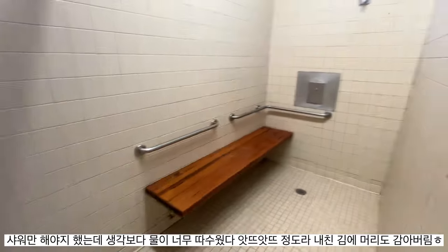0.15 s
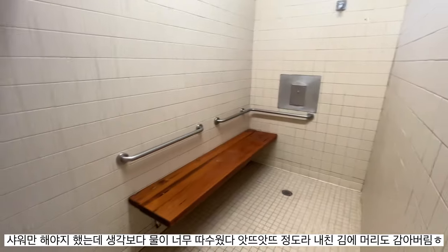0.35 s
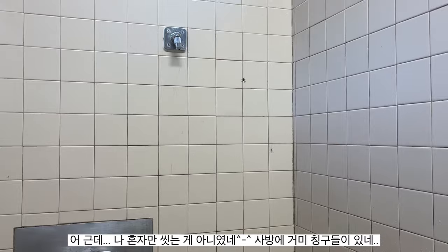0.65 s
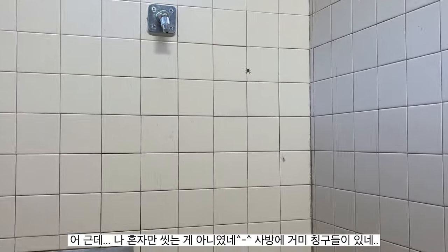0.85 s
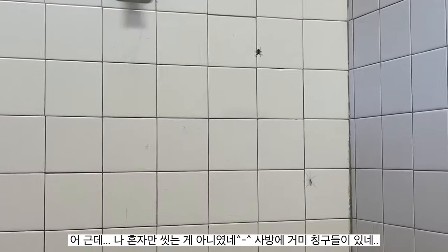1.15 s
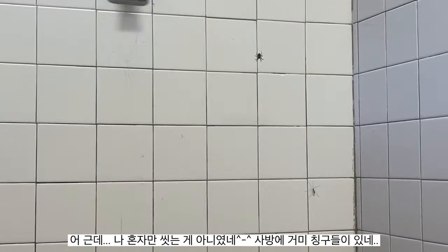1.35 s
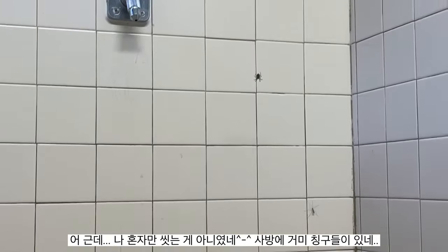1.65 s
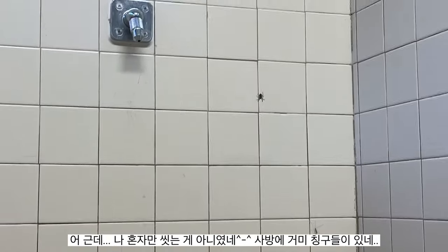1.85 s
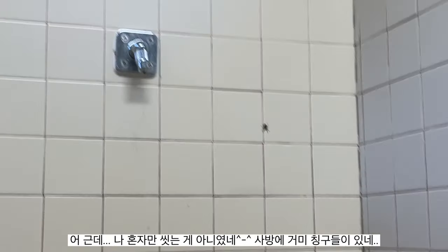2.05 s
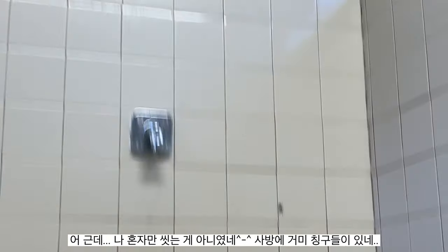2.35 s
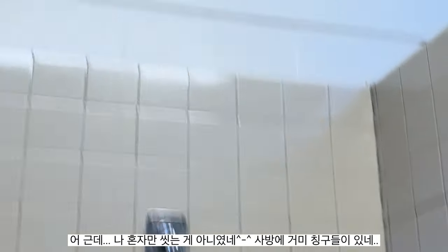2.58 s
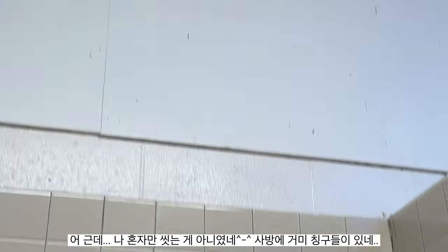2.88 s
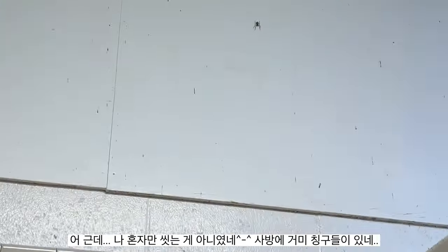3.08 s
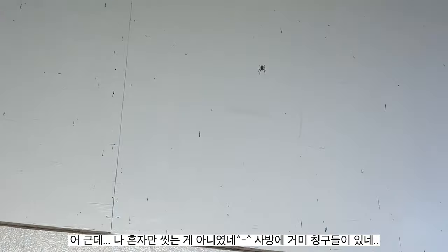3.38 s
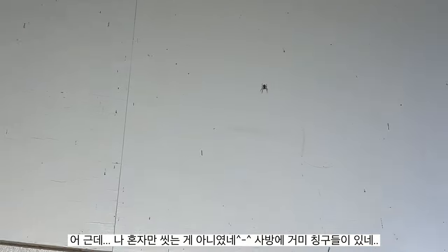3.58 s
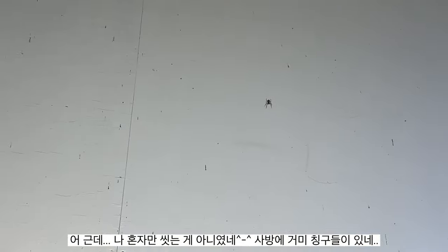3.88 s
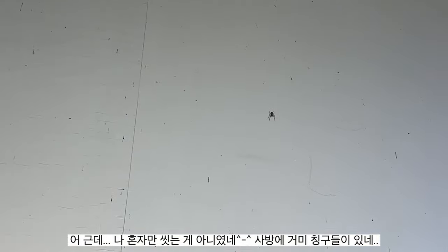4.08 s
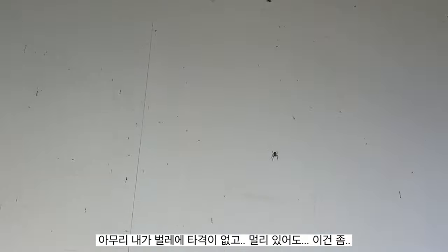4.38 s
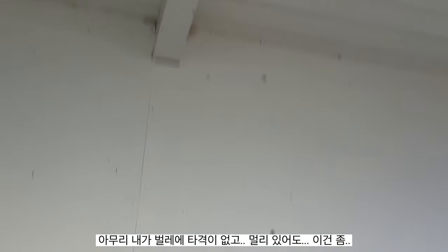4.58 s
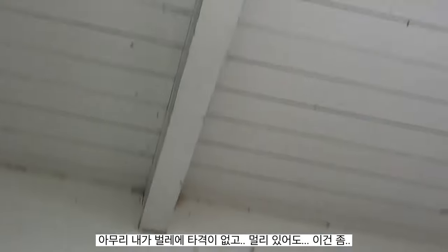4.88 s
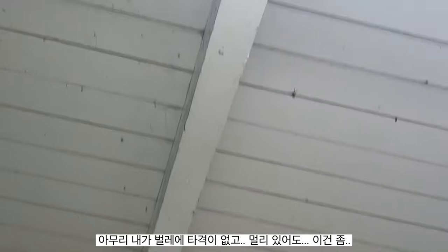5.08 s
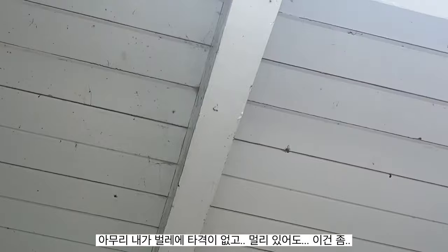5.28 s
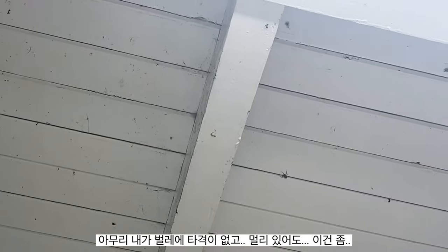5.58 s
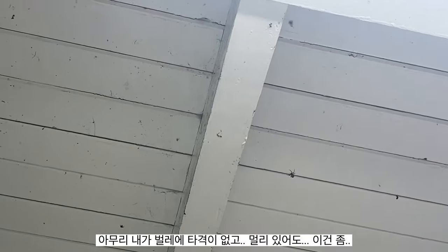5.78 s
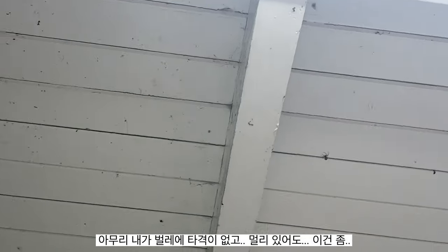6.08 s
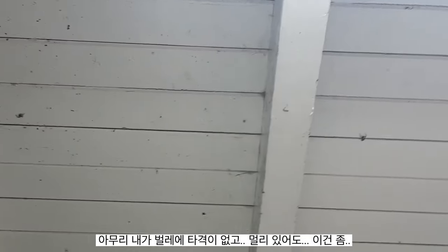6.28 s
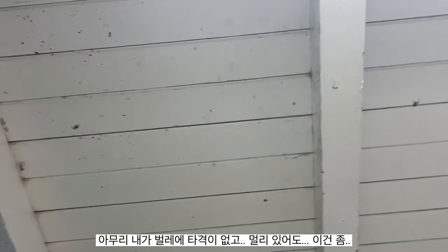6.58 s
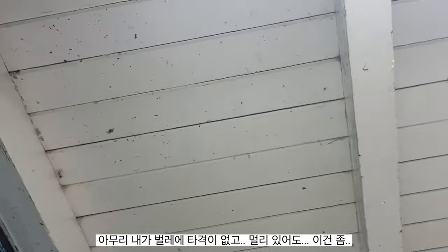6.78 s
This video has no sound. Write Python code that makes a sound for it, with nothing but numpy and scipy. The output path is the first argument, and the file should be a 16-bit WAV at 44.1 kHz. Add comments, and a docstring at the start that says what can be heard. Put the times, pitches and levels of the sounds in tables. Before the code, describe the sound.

Steady shower water drums and hisses on tiles in a small echoing stall, growing nearer at first, with sharp drips and small splashes.

```python
"""Shower in a tiled stall

Steady water on a small stall floor, heard from a camera carried up to it and tilted to the ceiling.
Shaped noise and thousands of random drop bursts make the wash and the bright hiss; timed bursts make
near ticks, slaps of water lumps and finger rubs on the camera. Decaying noise rings as the walls.
Low noise and damped sines make the building's rumble and the bumps; a noise swell makes a swish.
"""
import sys
import numpy as np
from scipy import signal
from scipy.fft import rfft, irfft, next_fast_len
from scipy.io import wavfile
from scipy.ndimage import map_coordinates

SR = 44100
rng = np.random.default_rng(int(sys.argv[2]) if len(sys.argv) > 2 else 0)


def dump(signal):
    """Clip the signal to [-1, 1] and save it as 16-bit WAV at the path in sys.argv[1]."""
    limited = np.clip(np.atleast_2d(signal).T, -1, 1)
    pcm = np.round(limited * 32767).astype(np.int16)
    wavfile.write(sys.argv[1], SR, pcm)


N = 306054

# Wash spectrum: f/Hz, gain/dB
WASH_SPECTRUM = [(60, -24), (130, -2.5), (220, -1.5), (330, -1.5), (520, 0.5), (800, 0.5), (1050, -2),
                 (1500, -2), (2000, -3), (3300, -6), (5000, -7.5), (8000, -13.5), (16000, -37)]
WASH_DB = -49  # at nearness 0 dB


def wash():
    """Water drumming on the wet floor: steady noise plus soft plops blurred by the room."""
    plops = patter(count=2600, low_hz=990, high_hz=4060, t60_s=.012, octaves=0.38,
                   scatter_db=2.5, rise_s=0.0018, size=512)
    water = rng.standard_normal((2, N)) + amp(-12.5) * stall(plops, wet_db=-4.0)
    return amp(WASH_DB + nearness_db()) * spread(water, WASH_SPECTRUM) * pan(.2)


# Spray spectrum: f/Hz, gain/dB
SPRAY_SPECTRUM = [(400, -30), (1500, -8.5), (3000, -0.5), (5000, -3.5), (7500, -2), (9500, -0.5),
                  (12500, -0.4), (13600, -2.5), (15800, -5)]
SPRAY_DB = -48  # at nearness 0 dB, before sway
SPRAY_DB_PER_NEARNESS_DB = 1.62  # heard directly, so it gains more than the wash
SWAY_DB, SWAY_KNOTS_PER_S = .35, 7  # the jet sways


def spray():
    """Fine drops crackle on the tiles in clumps, mostly to the left, over the hiss of the mist."""
    sway_db = SWAY_DB * wobble(SWAY_KNOTS_PER_S)
    spray_db = SPRAY_DB + SPRAY_DB_PER_NEARNESS_DB * nearness_db() + sway_db
    fine = patter(count=5000, low_hz=2560, high_hz=14900, t60_s=0.0044, octaves=0.73,
                  scatter_db=3, rise_s=0.0011, size=192)
    coarse = patter(count=480, low_hz=3270, high_hz=12900, t60_s=0.01, octaves=0.43,
                    scatter_db=2.0, rise_s=0.0016, size=512)
    clumping = amp(0.88 * wobble(26) + 0.59 * wobble(8.2))
    crackle = stall((fine + amp(-0.5) * coarse) * clumping, wet_db=-5.5)
    crackle = amp(-1.5) * spread(crackle, SPRAY_SPECTRUM) * pan(3.3)
    mist = spread(rng.standard_normal((2, N)), SPRAY_SPECTRUM) * amp(1.6 * wobble(30)) * pan(1.9)
    return amp(spray_db) * unit(crackle + mist)


# Fat close drops: t/s, level/dB, f/Hz
TICK_DROPS = [(.786, -30.5, 9400), (1.735, -32.5, 4000), (2.701, -32, 4200), (2.869, -32, 9000),
              (2.9881, -28.5, 3600), (2.992, -28.5, 6300), (3.677, -28.5, 10500), (3.769, -29.5, 3900),
              (4.19, -29, 4500), (4.24, -32, 6250), (4.267, -31, 9500), (4.489, -29, 6000),
              (4.697, -28.5, 9500), (4.88, -32, 3600), (5.587, -28, 3840), (6.738, -28, 11300)]
STRAY_DB = -66.5  # rms of stray drops at nearness 0 dB, before the stall


def ticks():
    """Single fat drops hit the tiles close by, with lesser random strays."""
    t_s, level_db, f_hz = np.transpose(TICK_DROPS)
    drops = splashes(f_hz, t60_s=0.0098, octaves=0.74, size=1024, rise_s=0.00073)
    drops = drops * amp(level_db)[:, None, None]
    strays = patter(count=30, low_hz=3200, high_hz=12000, t60_s=0.0086, octaves=0.53,
                    scatter_db=-0.5, rise_s=.0011, size=1024)
    strays = amp(STRAY_DB + nearness_db()) * strays
    return stall(place(t_s + .001, drops) + strays, wet_db=-5.0) * pan(2.9)


# Lumps of water: t/s, level/dB, f/Hz, t60/s
WATER_LUMPS = [(2.705, -48.5, 4500, .16), (3.546, -46, 3700, .14), (3.762, -49, 7000, .16),
               (3.986, -39.5, 13500, 0.11), (4.683, -42, 10000, .08), (5.2, -42.5, 11000, .14),
               (5.44, -42, 11500, 0.2), (5.545, -45, 2400, 0.2), (5.59, -44, 6530, 0.13),
               (6.74, -49, 10000, .17)]


def slaps():
    """Lumps of water land and scatter: longer noise bursts that ring in the stall."""
    t_s, level_db, f_hz, t60_s = np.transpose(WATER_LUMPS)
    lumps = splashes(f_hz, t60_s, octaves=0.86, size=8192, rise_s=0.0018)
    lumps = lumps * amp(level_db)[:, None, None]
    return stall(place(t_s, lumps), wet_db=-11) * pan(1)


# Camera's place relative to the water: t/s, level/dB
CAMERA_NEARNESS = [(0, -8.5), (.35, -2), (.68, -2.5), (1.2, 0.4), (2.35, 0.84), (2.75, -0.34), (6.94, -.5)]


def nearness_db():
    """Level change of the water with the camera's place, per sample."""
    return curves(CAMERA_NEARNESS)[0]


# Close water, little bass and a slightly duller top: f/Hz, gain/dB
CLOSE_COLOUR = [(800, -6), (2000, -0.5), (3200, 1.1), (12500, 1), (14000, -1)]


def close_water():
    """Ticks and slaps with the colour of close water."""
    return filtered(ticks() + slaps(), lambda hz: amp(along(CLOSE_COLOUR, hz)))


# Fingers shifting on the camera body: t/s, level/dB, f/Hz
FINGER_RUBS = [(1.49, -39, 1150), (1.929, -39, 2000), (2.325, -37.5, 1800), (4.522, -38, 600),
               (4.534, -39, 1700), (4.543, -36.5, 685), (5.576, -44, 1300)]


def brushes():
    """Fingers rub the camera body next to the right microphone, too close to ring in the room."""
    t_s, level_db, f_hz = np.transpose(FINGER_RUBS)
    rubs = splashes(f_hz, t60_s=.075, octaves=.5, size=4096, rise_s=.004)
    return place(t_s, rubs * amp(level_db)[:, None, None]) * pan(-3)


# Swish spectrum: f/Hz, gain/dB
SWISH_SPECTRUM = [(300, -3), (1500, -18), (2400, -5), (3100, -3.5), (4400, -5), (5500, -25), (12000, -28)]
SWISH_DB, SWISH_ATTACK_S, SWISH_HOLD_S, SWISH_RELEASE_S = -54, .13, 0.33, 0.13


def swish():
    """Soft rubbing during the first steps: noise that swells, holds and fades."""
    corners_s = np.cumsum([0, SWISH_ATTACK_S, SWISH_HOLD_S, SWISH_RELEASE_S])
    stroke = np.interp(np.arange(N) / SR, corners_s, [0, 1, 1, 0])
    return amp(SWISH_DB) * stroke * spread(rng.standard_normal((2, N)), SWISH_SPECTRUM) * pan(0.88)


# Drone level: t/s, level/dB
DRONE_LEVEL = [(0, -59.5), (.5, -61.5), (.7, -69), (1.4, -68), (4.1, -60.5), (6.94, -58)]
# Drone spectrum: f/Hz, gain/dB
DRONE_SPECTRUM = [(15, -16), (30, -18), (45, -7.5), (55, 0.5), (64, -5), (76, -3), (90, -10.5), (105, -4.5),
                  (140, -15), (300, -36)]
# Dull bumps of the carried camera: t/s, level/dB, f/Hz
CAMERA_BUMPS = [(.12, -49, 56), (0.535, -48.5, 58), (4.53, -49, 119), (5.219, -47, 47), (5.585, -50, 75.5)]


def rumble():
    """The building's low noise drone, plus bumps of the carried camera as damped sines."""
    drone_db = curves(DRONE_LEVEL)[0]
    drone = amp(drone_db) * spread(rng.standard_normal((2, N)), DRONE_SPECTRUM) * pan(0.99)
    t_s, level_db, f_hz = np.transpose(CAMERA_BUMPS)
    t = np.arange(SR // 4) / SR
    swell = t / .016  # envelope peaks at 16 ms
    envelope = swell * np.exp(1 - swell)
    bumps = amp(level_db)[:, None] * envelope * np.sin(2 * np.pi * f_hz[:, None] * t)
    return drone + place(t_s, np.stack([bumps, bumps], axis=1))


# Tiled stall decay: f/Hz, t60/s
STALL_DECAY = [(200, 0.49), (2000, 0.37), (6000, 0.34), (15000, 0.15)]


def stall(x, wet_db):
    """Add the ring of the tiled walls: noise with a decay time per frequency."""
    hz, t, z = signal.stft(rng.standard_normal((2, SR // 2)), SR, nperseg=256)
    decay = amp(-60 * t / along(STALL_DECAY, hz)[:, None])
    tail = signal.istft(z * decay, SR, nperseg=256)[1]
    tail = tail / np.linalg.norm(tail[0])
    return x + amp(wet_db) * signal.fftconvolve(x, tail, axes=1)[:, :N]


def patter(count, low_hz, high_hz, t60_s, octaves, scatter_db, rise_s, size):
    """Drops at random moments and pitches, levels scattered exponentially in dB; rms 1."""
    when, pitch, weight = rng.random((count, 3)).T
    sizes = amp(scatter_db * np.minimum(-np.log(1 - weight), 4))
    f_hz = low_hz + (high_hz - low_hz) * pitch
    drops = splashes(f_hz, t60_s, octaves, size=size, rise_s=rise_s)
    return unit(place(when * N / SR, drops * sizes[:, None, None]))


def splashes(f_hz, t60_s, octaves, size, rise_s):
    """One stereo burst per event: noise round its pitch that swells, then dies exponentially."""
    distance = np.log2((np.fft.rfftfreq(size, 1 / SR) + 1) / f_hz[:, None]) / octaves
    colour = 1 / (1 + distance ** 2)
    colour /= np.sqrt(np.mean(colour ** 2, axis=1, keepdims=True))
    noise = rng.standard_normal((len(f_hz), 2, size))
    bursts = irfft(rfft(noise) * colour[:, None], size)
    t = np.arange(size) / SR
    decay = amp(-60 * t / np.reshape(t60_s, (-1, 1, 1)))
    return bursts * (1 - np.exp(-t / rise_s)) * decay


def place(times_s, sounds):
    """Sum stereo sounds, each at its time."""
    starts = (np.abs(times_s) * SR).astype(int)
    at = (starts[:, None] + np.arange(sounds.shape[-1])).ravel()
    return np.array([np.bincount(at, sounds[:, side].ravel(), N)[:N] for side in (0, 1)])


# Left-right correlation: f/Hz, correlation
STEREO_LIKENESS = [(50, 0.6), (180, 0.19), (500, 0.54), (1000, 0.37), (2000, 0.31), (4000, 0.16),
                   (7000, 0.16), (11000, 0.11)]


def spread(pair, spectrum):
    """Mix two signals as mid and side into a coloured stereo field of rms 1."""
    def mid_side(hz):
        angle = np.arccos(np.clip(along(STEREO_LIKENESS, hz), -1, 1)) / 2
        return amp(along(spectrum, hz)) * [np.cos(angle), np.sin(angle)]

    mid, side = filtered(pair, mid_side)
    return unit(np.array([mid + side, mid - side]))


def from_left(x, lead_ms):
    """The left channel leads the right by lead_ms, as phase."""
    sides = np.array([[1], [-1]])
    return filtered(x, lambda hz: np.exp(1j * np.pi * hz * lead_ms / 1000 * sides))


def pan(db):
    """Left and right gains for a left-over-right level difference."""
    return amp([[db / 2], [-db / 2]])


def filtered(x, response):
    """x times a response of frequency."""
    m = next_fast_len(N + SR // 4)
    return irfft(rfft(x, m) * response(np.fft.rfftfreq(m, 1 / SR)), m)[..., :N]


def wobble(knots_per_s):
    """Smooth random curve."""
    knots = rng.standard_normal(int(N * knots_per_s / SR) + 4)
    return map_coordinates(knots, [np.arange(N) * knots_per_s / SR])


def curves(rows):
    """One value per sample for each column after the time."""
    t_s, *cols = np.transpose(rows)
    return [np.interp(np.arange(N) / SR, t_s, c) for c in cols]


def along(points, hz):
    """(f/Hz, value) points read on a log frequency axis."""
    f, v = np.transpose(points)
    return np.interp(np.log(hz + 1), np.log(f + 1), v)


def unit(x):
    """x at rms 1."""
    return x / np.sqrt(np.mean(x ** 2) + 1e-20)


def amp(db):
    """Decibels to gain."""
    return 10 ** (np.asarray(db) / 20)


def scene():
    """The water from the left, then the handling of the camera, the swish and the building."""
    water = from_left(wash() + spray() + close_water(), lead_ms=0.065)
    return water + brushes() + swish() + rumble()


TOP_HZ = 15850


def record(dry):
    """The camera keeps nothing above its band limit."""
    return filtered(dry, lambda hz: hz < TOP_HZ)


dry = scene()
out = record(dry)
dump(out)
```